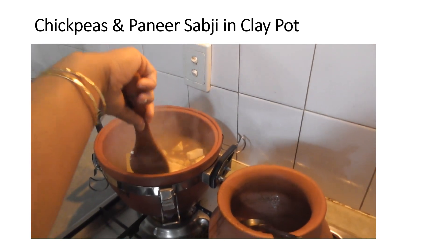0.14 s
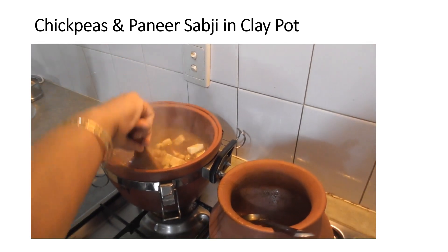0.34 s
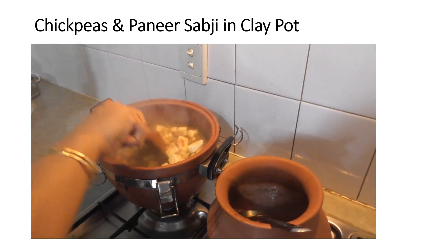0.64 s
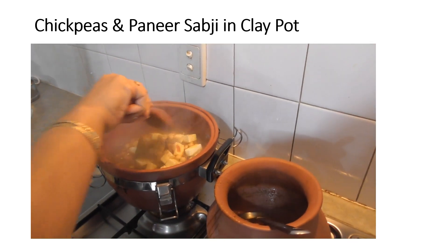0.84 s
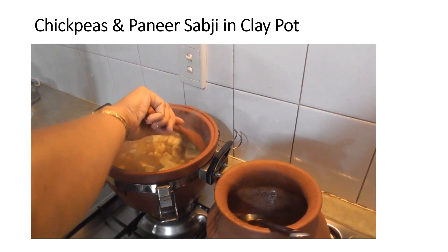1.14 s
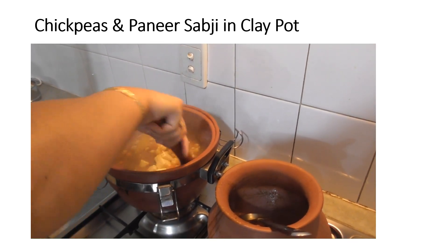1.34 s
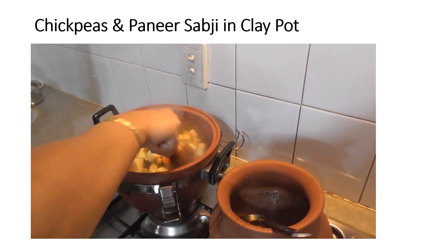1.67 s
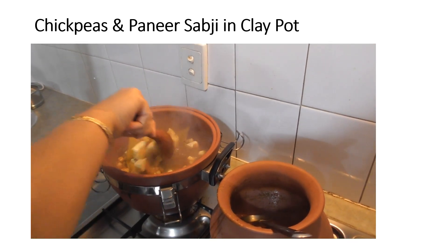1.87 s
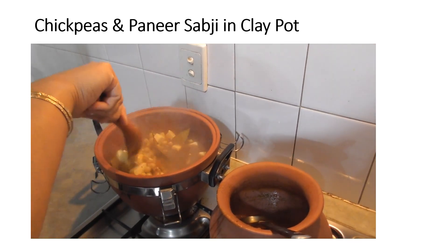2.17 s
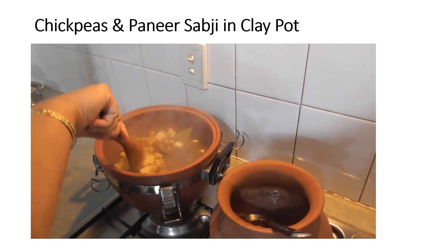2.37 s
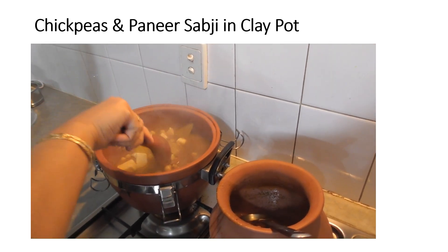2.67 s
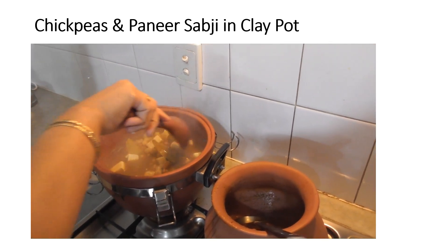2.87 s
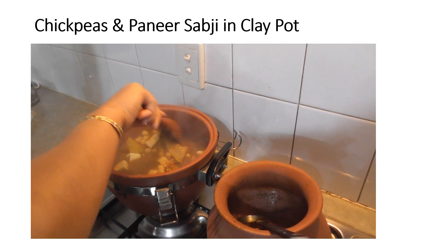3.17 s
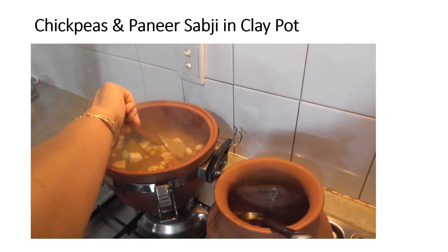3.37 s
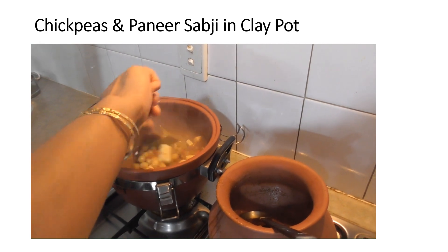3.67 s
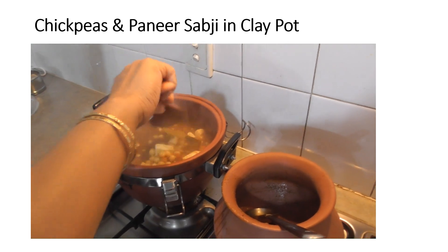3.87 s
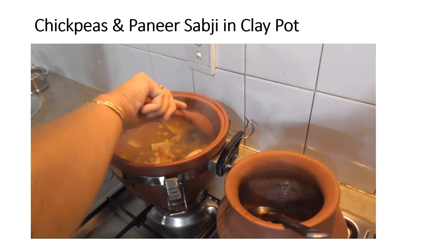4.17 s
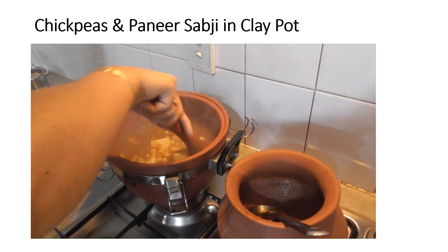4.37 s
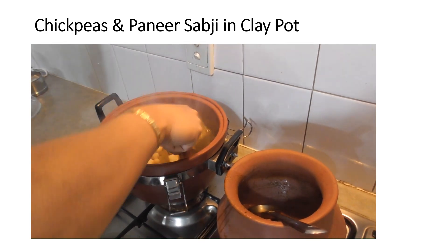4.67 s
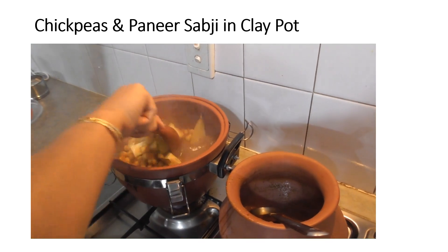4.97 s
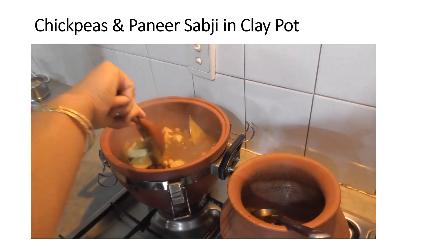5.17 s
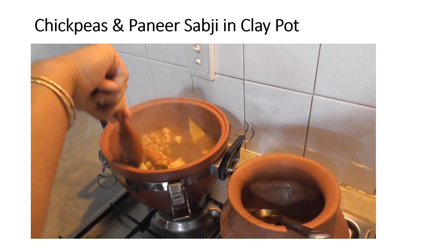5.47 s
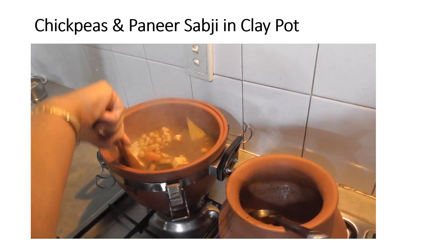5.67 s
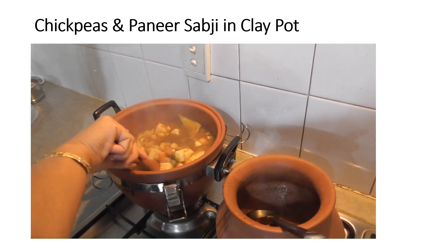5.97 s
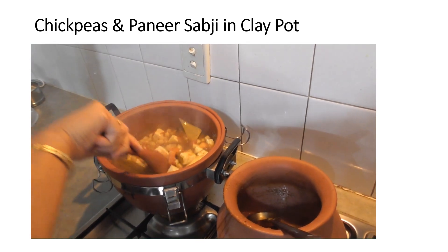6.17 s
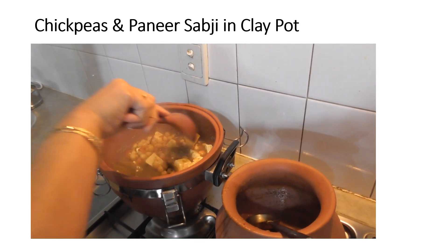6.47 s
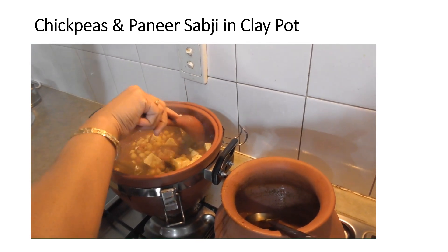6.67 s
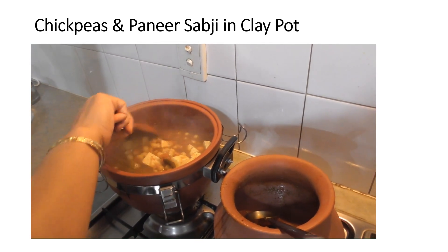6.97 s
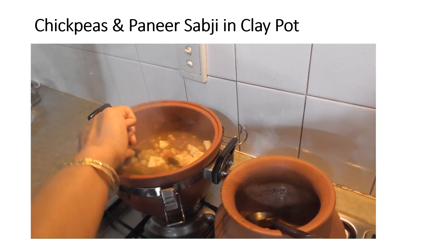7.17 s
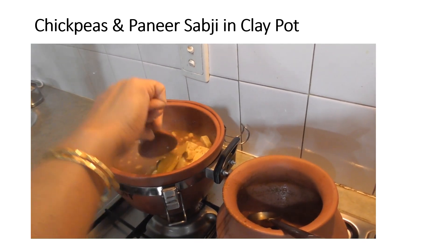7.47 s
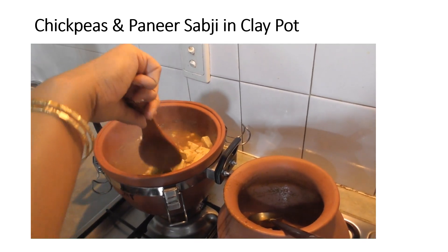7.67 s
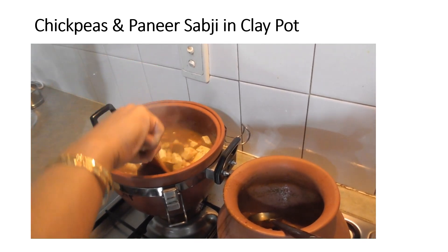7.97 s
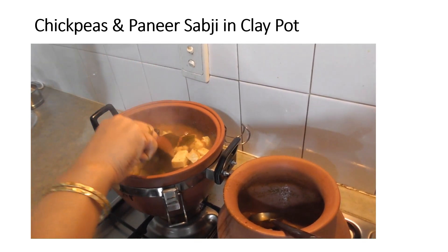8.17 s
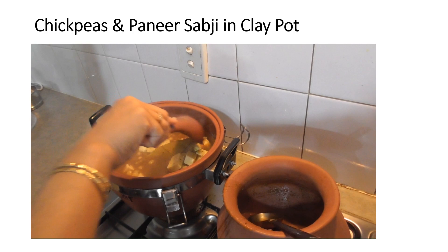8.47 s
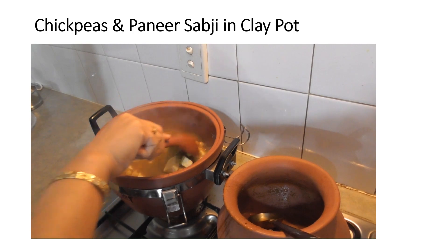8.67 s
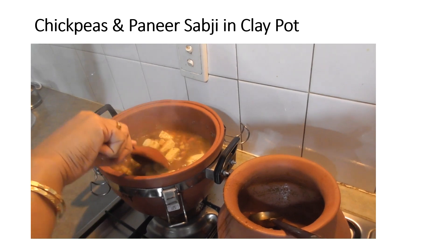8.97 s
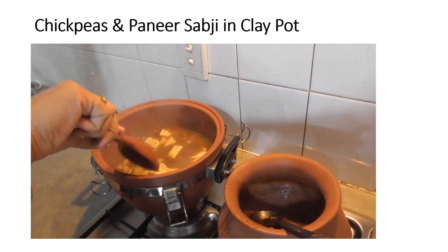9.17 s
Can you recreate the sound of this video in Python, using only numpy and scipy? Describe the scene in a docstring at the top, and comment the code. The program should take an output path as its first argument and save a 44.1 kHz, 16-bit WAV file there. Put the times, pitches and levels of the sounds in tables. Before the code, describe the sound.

A gas flame rumbles and hisses softly beneath slow stirring. First come wet crackles and one dull knock, then a sharp hollow clay knock at three seconds and others later, with a cluster of taps and scrapes near seven. Small sticky pops burst around five seconds. Thin bangle clinks appear early and late. Close microphone, short bright tiled-room reflections.

```python
"""Stirring curry in a clay pot

A wooden spoon stirs thick curry on a gas stove, in a tiled kitchen. Its knocks excite damped
resonances of stand, pot and spoon; its drags are noise from dense grain contacts, ringing in the clay.
The sauce pops as short swelling tones with a noisy film, and hot oil spits as decaying treble noise.
Bangles clink as sums of damped modes. Under all this the burner's filtered noise rumbles, roars and
hisses; the recorder's noise suppressor lets the roar in slowly, then fully, as the rumble swells briefly.
"""
import sys
import numpy as np
from scipy import signal
from scipy.fft import rfft, irfft, next_fast_len
from scipy.io import wavfile
from scipy.ndimage import map_coordinates

SR = 44100
rng = np.random.default_rng(int(sys.argv[2]) if len(sys.argv) > 2 else 0)


def file_out(sig):
    """Save sig as 16-bit WAV at sys.argv[1]."""
    # one column per channel
    cols = np.atleast_2d(sig).T
    # limit, then scale
    lim = np.clip(cols, -1, 1)
    pcm = np.round(lim * 32767).astype(np.int16)
    wavfile.write(sys.argv[1], SR, pcm)


N = 411453
T = np.arange(SR // 3) / SR  # time since a contact, s

# spoon blows on the wall: t/s, then level/dB of thud, belly, rim, wall note, spoon clack and grit,
# judder/1 (0 clean, 2 glancing), level/dB of the slide that follows
KNOCKS = [(0.9776, -31.5, -37, -34, -64, -65, -34, 3.4, -44.5),
          (2.9961, -33, -27.5, -24.5, -39.5, -34.5, -25.5, 0.44, -46.5),
          (4.072, -33, -30, -31, -43.5, -46, -30.5, 2.1, -43),
          (5.5656, -40.5, -36.5, -30, -38.5, -62, -28.5, 1.4, -51.5),
          (5.788, -38.5, -41, -41, -63, -65, -45, 2.1, -68),
          (6.615, -34, -30.5, -27, -40, -39.5, -29, 2.4, -48),
          (6.871, -48, -39, -41, -59, -59, -41.5, 1.8, -68)]
# spectrum of a fine spray or metallic tick: f/Hz, relative density/dB per Hz
SPRAY = [(3000, -40), (6500, 8), (8500, 18), (13000, 11), (16000, 2)]
# spectrum of the pot's grumble on its stand: f/Hz, relative density/dB per Hz
RUB = [(50, -11), (105, 5.5), (200, 2.5), (500, -3), (850, -6.5), (1300, -25), (3000, -90)]


def amp(db):
    """Level to amplitude ratio: 20 dB is a factor of ten."""
    return 10 ** (np.asarray(db) / 20)


def unit(x):
    """Normalisation to an rms of 1."""
    return x / np.sqrt(np.mean(x ** 2) + 1e-20)


def struck(x):
    """Normalisation of a transient to an rms of 1 over its first fiftieth of a second."""
    return x / np.sqrt(np.mean(x[:SR // 50] ** 2) + 1e-20)


def along(points, hz):
    """Interpolation of (f/Hz, value) points on a logarithmic frequency axis."""
    f, v = np.transpose(points)
    return np.interp(np.log(hz + 1), np.log(f + 1), v)


def filtered(x, response):
    """Linear filtering: the spectrum of x is multiplied by a response of frequency."""
    n = x.shape[-1]
    m = next_fast_len(n + 8192)  # padding keeps the filter's ringing from wrapping round
    return irfft(rfft(x, m) * response(np.fft.rfftfreq(m, 1 / SR)), m)[..., :n]


def coloured(x, spectrum):
    """Spectral shaping: x weighted by a spectrum, at rms 1."""
    return unit(filtered(x, lambda hz: amp(along(spectrum, hz))))


def wobble(rate):
    """Slow modulation: a smooth curve through random knots, rate of them a second."""
    knots = rng.standard_normal(int(N * rate / SR) + 4)
    return map_coordinates(knots, [np.arange(N) * rate / SR])


def fade(t60):
    """Exponential decay by 60 dB in t60 seconds."""
    return np.exp(-np.log(1000) * T / t60)


def grains(size, spread_db):
    """Granular friction: dense micro-contacts whose strength changes about every millisecond."""
    strength = np.repeat(rng.standard_normal(size // 40 + 1), 40)[:size]
    return rng.standard_normal(size) * amp(spread_db * strength)


def add(track, s, sound):
    """Superposition: mix a sound into the track at time s, in place."""
    part = track[..., round(s * SR):][..., :sound.shape[-1]]
    part += sound[..., :part.shape[-1]]


def resonant(x, peaks):
    """Modal response: band-pass resonances of alternating sign; little leaks out above the last."""
    def response(f):
        body = 0
        for k, (hz, width, db) in enumerate(peaks):
            damping = 1j * f * width
            body = body + (-1) ** k * amp(db) * damping / (hz * hz - f * f + damping)
        f = f / (1.22 * peaks[-1][0])
        return body / (1 - f * f + 1.3j * f) ** 3
    return filtered(x, response)


def through(x, wall):
    """Convolution: x excites an impulse response and rings on in it."""
    return signal.fftconvolve(x, wall)[:len(x)]


def clay_wall(share, t60):
    """High modal density: close treble modes act as decaying noise, the same for every touch."""
    spectrum = [(1500, -29), (4000, -4.5), (16000, 5)]  # f/Hz, relative density/dB per Hz
    modes = coloured(rng.standard_normal(len(T)), spectrum)
    modes *= (1 - np.exp(-T / 0.00078)) * fade(t60)
    modes *= share / np.linalg.norm(modes)
    modes[0] += 1  # the direct sound
    return modes / np.linalg.norm(modes)


def kitchen(x, wet_db, width=0.12):
    """Reverberation: direct sound plus decaying noise from tiled walls, partly different in each ear."""
    # reverberation time of the room: f/Hz, t60/s
    decay_times = [(100, 0.39), (500, 0.3), (2000, 0.34), (8000, 0.19), (16000, 0.038)]
    hz, t, z = signal.stft(rng.standard_normal((2, SR // 2)), SR, nperseg=256)
    decay = np.exp(-np.log(1000) * t / along(decay_times, hz)[:, None])
    mid, side = signal.istft(z * decay, SR, nperseg=256)[1]
    tail = np.array([mid + width * side, mid - width * side])
    tail /= np.linalg.norm(tail[0])
    return x + amp(wet_db) * signal.fftconvolve(x[None], tail, axes=1)[:, :len(x)]


def scattered(x, side_db):
    """Scattering: the highest treble reaches the recorder's two microphones in opposite phase off its body."""
    body_ir = rng.standard_normal(SR // 500)
    scattered_part = through(x, body_ir / np.linalg.norm(body_ir))
    side = filtered(scattered_part, lambda hz: 1 - 1 / (1 + (hz / 9800) ** 10))
    return amp(side_db) * np.array([side, -side])


def stream(spectrum):
    """Partial coherence: stationary stereo noise whose ears are alike to a degree set by frequency."""
    # coherence of the two ears: f/Hz, left-right correlation/1
    alike = [(60, 1), (130, 0.86), (290, 0.81), (640, 0.84), (1410, 0.99), (3100, 1), (6820, 1),
             (15000, 0.37)]

    def mid_and_side(hz):
        turn = np.arccos(np.clip(along(alike, hz), -1, 1)) / 2
        return np.array([np.cos(turn), np.sin(turn)])
    mid, side = filtered(rng.standard_normal((2, N)), mid_and_side)
    return coloured(np.array([mid + side, mid - side]), spectrum)


def burner():
    """Turbulence noise: the flame rumbles and roars in hollows under the pot; the gas jet hisses evenly."""
    # spectrum of the flame: f/Hz, relative density/dB per Hz
    flame_spectrum = [(20, -11.5), (60, -4), (110, 1.5), (170, -2), (245, -10), (320, -6.5), (500, -5.5),
                      (700, -8), (880, -11), (1100, -14.5), (1250, -27.5), (1420, -44), (2000, -42)]
    # spectrum of the gas jet: f/Hz, relative density/dB per Hz
    jet_spectrum = [(880, -74), (1400, -11), (1690, -14.5), (1940, -14), (2540, -11.5), (2720, -13.5),
                    (3590, -18.5), (4550, -7), (5170, -22), (6500, -8), (7600, 2.5), (8200, 3), (8900, 0.5),
                    (9750, 4.5), (10700, -12), (13300, -10), (16000, -19)]
    # hollows around the burner that colour the flame: f/Hz, width/Hz, level/dB
    hollows = [(299, 22, 6), (350, 18, 3), (396, 24, 9.5), (479, 20, 6), (522, 24, 6), (575, 25, -4),
               (618, 30, 5), (810, 40, 3), (880, 40, 3)]
    # the recorder's noise suppressor lets the roar in slowly, then fully
    start_db, low_db, full_db = -57.5, -52.5, -50
    release_s, release_rise_s = 2.28, 0.044  # when it lets the roar in fully, and how fast
    puff_peak_db, puff_s = 5.5, 0.12  # the rumble swells at that moment, then falls back
    rumble_db, hiss_db = -53.5, -54.5

    def hollow_gain(f):
        return amp(sum(db / (1 + (2 * (f - hz) / width) ** 2) for hz, width, db in hollows))
    t = np.arange(N) / SR
    roar_db = np.interp(t, [0, release_s, release_s + release_rise_s], [start_db, low_db, full_db])
    puff_db = np.interp(t - release_s, [0, release_rise_s, release_rise_s + puff_s], [0, puff_peak_db, 0])
    flame = filtered(stream(flame_spectrum), hollow_gain)
    low = filtered(flame, lambda hz: 1 / (1 + (hz / 245) ** 8))
    roar = amp(roar_db + 0.46 * wobble(8.9)) * unit(flame - low)
    rumble = amp(rumble_db + puff_db + 0.6 * wobble(7.3)) * unit(low)
    return rumble + roar + amp(hiss_db) * stream(jet_spectrum)


def shudder():
    """Energy decay: every thud sets the full pot shuddering on its stand; it dies away in uneven lumps."""
    level_db, fall_db_per_s = -11, 26  # start level against the thud, and decay rate
    lump_db, lump_hz = 2, 13  # depth and rate of the lumps
    fall_db = fall_db_per_s * np.arange(2 * SR) / SR
    power = np.zeros(N)
    for s, thud_db, *_ in KNOCKS:
        add(power, s, amp(thud_db + level_db - fall_db) ** 2)
    return np.sqrt(power) * amp(lump_db * wobble(lump_hz)) * stream(RUB)


def ring(modes, vary_db):
    """Modal superposition: damped sines, at new strengths for every blow."""
    out = np.zeros(len(T))
    for hz, db, t60 in modes:
        strength = amp(db + vary_db * rng.standard_normal())
        out += strength * fade(t60) * np.sin(2 * np.pi * hz * T)
    return out


def bangles():
    """Free vibration of thin metal hoops: a noisy tick and a short high ring."""
    # touches of the bangles on the stirring wrist: t/s, level/dB
    clinks = [(0.785, -51), (8.3797, -53), (8.6213, -51.5), (9.215, -52)]
    # modes of a bangle: f/Hz, level/dB, t60/s
    hoop_modes = [(7930, -28, 0.09), (8040, 6.5, 0.11), (11000, -3, 0.078), (11410, -2, 0.086),
                  (12100, -13, .06), (12900, -16, .07), (12940, 10.5, 0.11), (13900, -17, .05),
                  (15300, -4, .05)]
    out = np.zeros(N)
    for s, db in clinks:
        tick = coloured(rng.standard_normal(len(T)), SPRAY) * fade(0.038)
        add(out, s, amp(db) * (ring(hoop_modes, vary_db=1) + .45 * tick))
    return out


def bubble(hz, cycles):
    """Bubble resonance: a tone peaks after the given cycles and dies, as the film crackles away."""
    u = T * hz / cycles
    tone = (u * np.exp(1 - u)) ** 2 * np.sin(2 * np.pi * hz * T)
    # film noise lies around the tone, in a narrower band for more cycles
    film = filtered(rng.standard_normal(len(T)),
                    lambda f: np.exp(-np.log((f + 1) / hz) ** 2 * 4 * cycles))
    return tone + 0.37 * unit(film) * fade(0.053)


def sauce():
    """Bursting bubbles and oil: pops and spits stand out of a faint random crackle."""
    # loudest wet smacks: t/s, tone peak level/dB, f/Hz
    pops = [(0.292, -37, 6900), (2.033, -43.5, 6900), (2.092, -37, 7800), (4.9488, -26.5, 7700),
            (4.962, -29, 8060), (4.9733, -28.5, 7600), (5.047, -35.5, 7660), (5.739, -36.5, 7000),
            (8.006, -36, 7760), (8.267, -37.5, 7100)]
    # tiny bursts of hot oil: t/s, level/dB (before the decay)
    spits = [(0.2237, -42), (1.882, -38), (2.1405, -43), (3.6386, -43.5), (5.0886, -43), (5.2719, -46.5)]
    out = np.zeros(N)
    for s, db, hz in pops:
        add(out, s, amp(db) * bubble(hz, cycles=5.0))
    for s, db in spits:
        decay = fade(0.013) + 0.098 * fade(0.032)
        add(out, s, amp(db) * coloured(rng.standard_normal(len(T)), SPRAY) * decay)
    for when, size, pitch in rng.random((70, 3)):
        crackle = bubble(3400 * 3 ** pitch, cycles=0.41)
        add(out, when * N / SR, amp(-53.0 + 5.6 * size) * crackle)
    return out


def stirs():
    """Random bubble bursts: each pass of the spoon through the sauce bursts a scatter of small ones."""
    # passes through the sauce: start t/s, length/s, level/dB of a bubble at the highest pitch
    passes = [(0.248, 0.31, -43.5), (1.647, 0.62, -47.5), (4.837, 0.36, -43), (6.036, 0.28, -48.5),
              (7.85, 0.47, -50)]
    bubbles_per_s, spread_db = 26, 0.5
    low_hz, high_hz, db_per_octave = 3310, 8400, 8.5  # small, high bubbles snap louder
    out = np.zeros(N)
    for s, length, db in passes:
        count = round(length * bubbles_per_s)
        for k in range(count):
            hz = low_hz * (high_hz / low_hz) ** rng.random()
            level_db = db + db_per_octave * np.log2(hz / high_hz) + spread_db * rng.standard_normal()
            when = s + length * (k + rng.random()) / count
            add(out, when, amp(level_db) * bubble(hz, cycles=4.1))
    return out


def taps():
    """Light impact: a dry grainy tick and a little of the pot's hollow, both as decaying noise."""
    # light touches of the spoon: t/s, tick level/dB, hollow level/dB (both before the decay)
    touches = [(3.5178, -48, -36.5), (4.9475, -46.5, -38.5), (5.52, -35.5, -62), (6.737, -36.5, -61),
               (6.8075, -41.5, -57), (7.1522, -38, -53), (7.189, -43.5, -54), (7.2728, -43.5, -37.5)]
    # spectrum of the tick: f/Hz, relative density/dB per Hz
    tick_spectrum = [(1400, -60), (2200, -1), (4000, 2), (5300, -2), (7500, 8.5), (10000, 2), (16000, -17)]
    # spectrum of the pot's hollow: f/Hz, relative density/dB per Hz
    hollow_spectrum = [(100, -50), (300, -12), (700, 10.5), (1000, 7.5), (1400, -6), (1800, -1.5),
                       (2500, -9.5), (4200, -13.5), (6000, -20), (9000, -81)]
    out = np.zeros(N)
    for s, db, hollow_db in touches:
        tick = amp(db) * coloured(grains(len(T), spread_db=2.0), tick_spectrum) * fade(0.049)
        hollow = amp(hollow_db) * coloured(rng.standard_normal(len(T)), hollow_spectrum) * fade(0.06)
        add(out, s, tick + hollow * (1 - np.exp(-T / 0.00047)))
    return out


def drags(wall):
    """Stick-slip: wood catches on the clay's grains; coarser patches rasp lower, and the pot grumbles."""
    # separate strokes over the clay, and one soft swish through the sauce at 4.86 s:
    # start t/s, length/s, level/dB, coarse bite/dB
    strokes = [(1.244, 0.07, -44, -2.5), (3.22, 0.052, -46.5, -4), (3.293, 0.053, -44, -3.5),
               (4.474, 0.028, -48, 3), (4.86, 0.2, -51.5, -6), (4.926, 0.039, -44.5, -5),
               (6.768, 0.047, -41, -3), (6.872, 0.088, -44, -0.5), (7.013, 0.055, -42.5, 3),
               (8.768, 0.039, -43, 1)]
    # spectrum of wood rasping on clay: f/Hz, relative density/dB per Hz
    rasp_spectrum = [(1300, -31), (1800, -15), (2700, -15.5), (4200, -4.5), (5300, -9.5), (7300, 1.5),
                     (9000, -3.5), (11000, -13), (16000, -21)]
    slide_delay_s, slide_s, slide_bite_db = 0.05, 0.18, -4  # after a knock the spoon slides on
    rub_db = -7.5  # the pot's grumble against the rasp that drives it
    rasp, rub = np.zeros((2, N))
    slides = [(s + slide_delay_s, slide_s, slide_db, slide_bite_db) for s, *_, slide_db in KNOCKS]
    for s, length, db, coarse_db in slides + strokes:
        pressure = np.sin(np.pi * np.clip(T / length, 0, 1)).clip(0) ** .5

        def bite(hz):  # lifts or lowers the band around 4300 Hz
            return amp(coarse_db * np.exp(-np.log2((hz + 1) / 4300) ** 2 * 3))
        contacts = filtered(grains(len(T), spread_db=4.5), bite)
        add(rasp, s, amp(db) * pressure * coloured(contacts, rasp_spectrum))
        grumble = coloured(rng.standard_normal(len(T)), RUB)
        add(rub, s, amp(db + rub_db) * pressure * grumble)
    slips = amp(2.2 * wobble(130))
    return through(rasp * slips, wall) + rub


def blow(judder, t60):
    """Impact excitation: one impulse, then a quick judder of wood on rough clay as decaying noise."""
    force = rng.standard_normal(len(T)) * (1 - np.exp(-T / 0.00034)) * fade(t60)
    force *= judder / np.linalg.norm(force)
    force[0] += 1
    return force


def knocks(wall):
    """Struck resonators: a blow thuds the stand, rings the food-damped pot, clacks and crunches grit."""
    # resonances of stand, pot belly, pot rim, thick wall and spoon: f/Hz, width/Hz, level/dB
    stand = [(50, 45, -9.5), (111.2, 10.7, 5), (195.5, 18, 4.5), (298, 10.4, 5)]
    belly_modes = [(391, 41, -6), (477, 23, 2), (576, 90, -0.5)]
    rim_modes = [(671, 80, -1.5), (802, 53, -1.5), (890, 77, -3), (1063, 370, -11)]
    wall_note = [(1750, 115, 0)]
    spoon = [(2050, 910, -6), (2680, 220, -6), (3100, 500, -13.5), (3870, 270, -3.5), (4640, 640, -22)]
    # spectrum of crunching grit: f/Hz, relative density/dB per Hz
    grit = [(2000, -21.5), (4000, -8), (5200, -12), (7000, 0), (8600, 2.5), (10500, -7.5), (13000, -11),
            (16000, -21)]
    # a square blow shoves the stove: level against the rim, loss per unit of judder, pitch
    shove_db, shove_loss_db, shove_hz = -10, 11, 55
    out = np.zeros((2, N))
    for s, thud_db, belly_db, rim_db, note_db, clack_db, grit_db, judder, _ in KNOCKS:
        thud = amp(thud_db) * struck(resonant(blow(judder * 0.14, t60=0.026), stand))
        push = struck(np.sin(2 * np.pi * shove_hz * T) * fade(0.066))
        shove = amp(rim_db + shove_db - shove_loss_db * judder) * push
        belly = amp(belly_db) * struck(resonant(blow(judder * .4, t60=.08), belly_modes))
        rim = amp(rim_db) * struck(resonant(blow(judder * .5, t60=0.034), rim_modes))
        force = blow(judder, t60=0.034)
        note = amp(note_db) * struck(resonant(force, wall_note))
        clack = amp(clack_db) * struck(resonant(force, spoon))
        # a glancing blow bites into the grit more slowly
        bite = (1 - np.exp(-T / (0.00067 * abs(judder) + .0001))) ** 2 * fade(0.1)
        gritty = coloured(grains(len(T), spread_db=3.5), grit) * bite
        crunch = amp(grit_db) * struck(through(gritty, wall))
        body = kitchen(thud + belly + rim, wet_db=-8, width=.8)
        bright = kitchen(note + clack + crunch, wet_db=-12, width=0.3)
        add(out, s, shove + body + bright + scattered(crunch, side_db=1.5))
    return out


def scene():
    """Superposition of spoon, sauce and bangles in the kitchen, over the burner."""
    wall = clay_wall(share=.7, t60=.04)
    stove = burner() + shudder() + knocks(wall)
    small = bangles() + sauce() + stirs()
    rubbing = through(taps(), wall) + drags(wall)
    near = kitchen(rubbing, wet_db=-8, width=0.1) + kitchen(small, wet_db=-9)
    return stove + near + scattered(rubbing + small, side_db=3.5)


def record(dry):
    """Receiver response: more bass on the right, a dip in the microphone's mids, and a band limit."""
    # balance of the two ears: f/Hz, left minus right level/dB
    lean = [(60, -4), (150, -4), (380, -0.5), (950, 1.5), (2380, 0.5), (5980, 0), (15000, -1)]
    notch_hz, notch_width_hz, notch_db = 1403, 136, -9.5
    top_hz = 16000  # nothing passes from here up

    def response(hz):
        dip_db = notch_db / (1 + (2 * (hz - notch_hz) / notch_width_hz) ** 2)
        return amp(dip_db + np.outer([.5, -.5], along(lean, hz))) * (hz < top_hz)
    return filtered(dry, response)


dry = scene()
out = record(dry)
file_out(out)
```